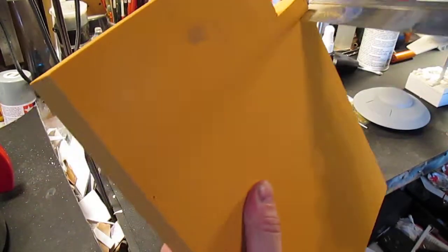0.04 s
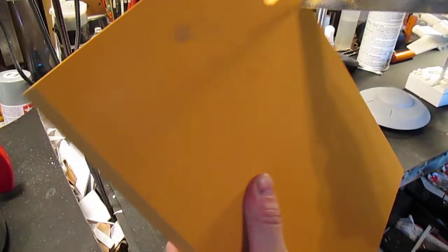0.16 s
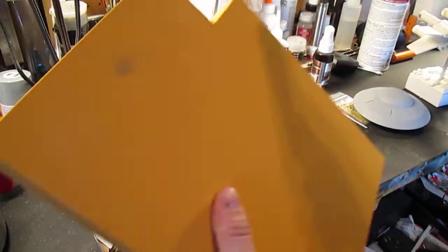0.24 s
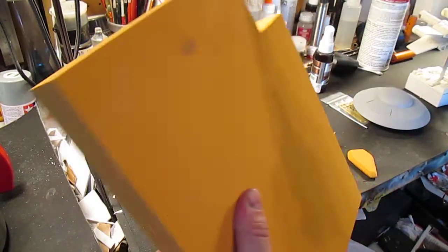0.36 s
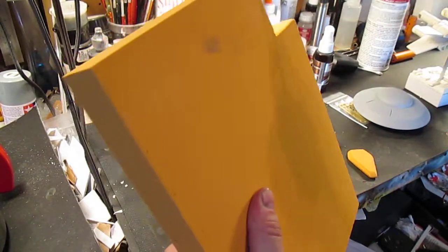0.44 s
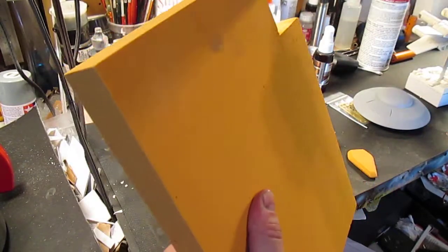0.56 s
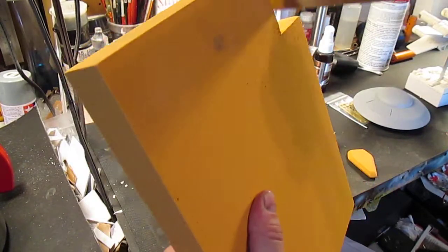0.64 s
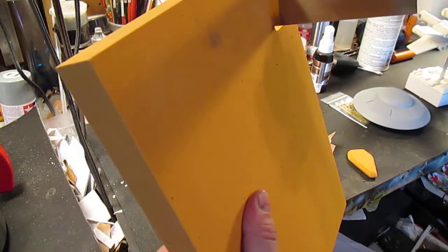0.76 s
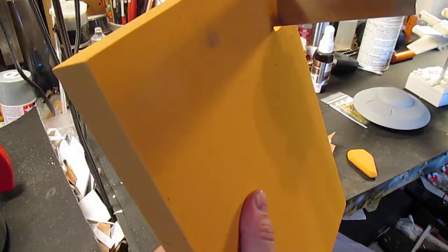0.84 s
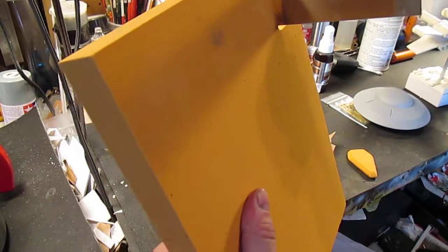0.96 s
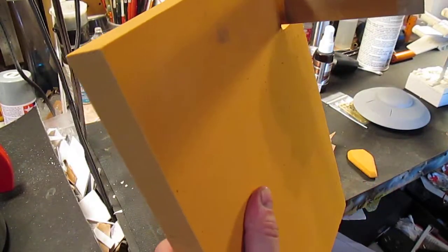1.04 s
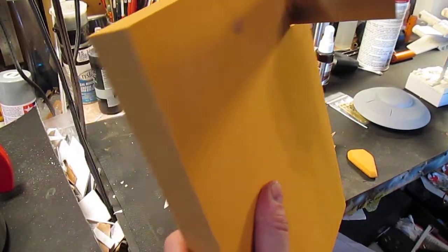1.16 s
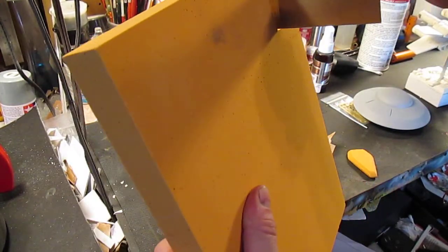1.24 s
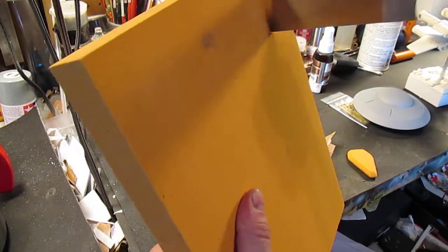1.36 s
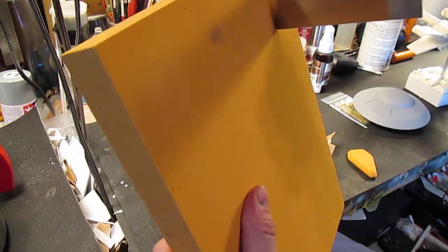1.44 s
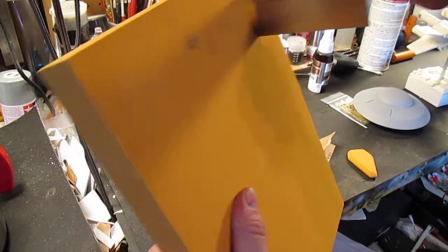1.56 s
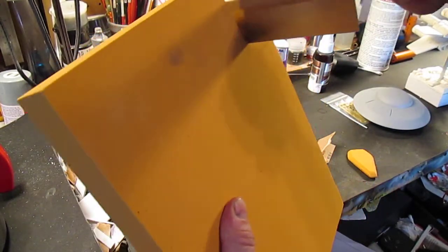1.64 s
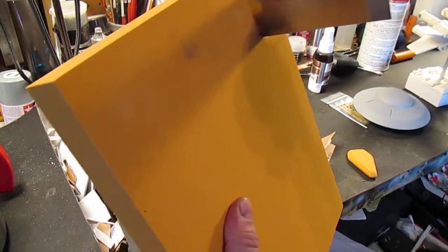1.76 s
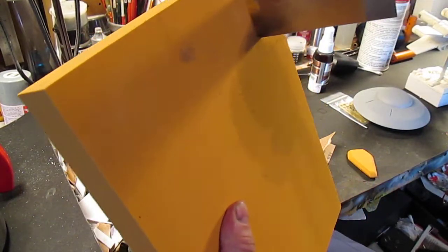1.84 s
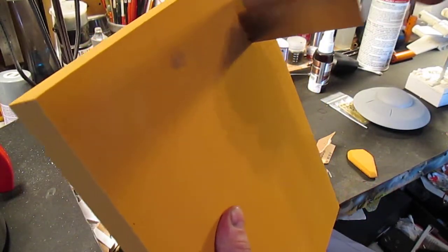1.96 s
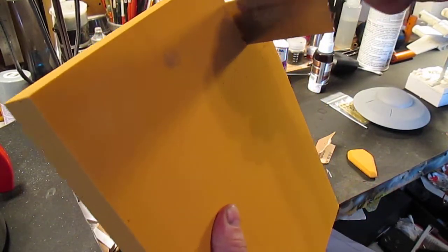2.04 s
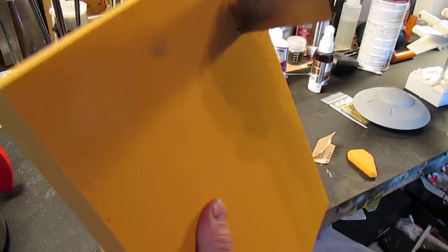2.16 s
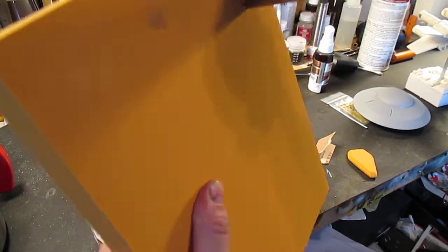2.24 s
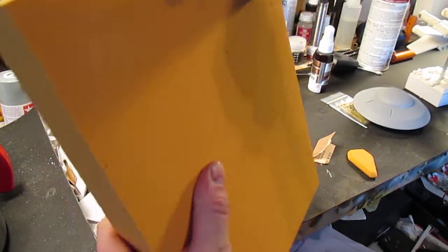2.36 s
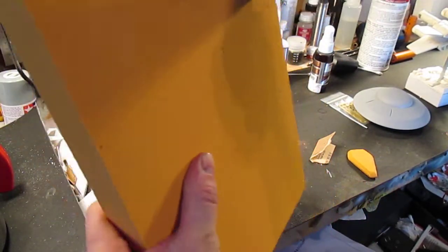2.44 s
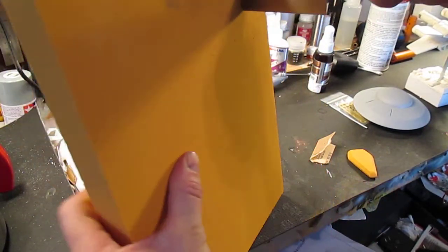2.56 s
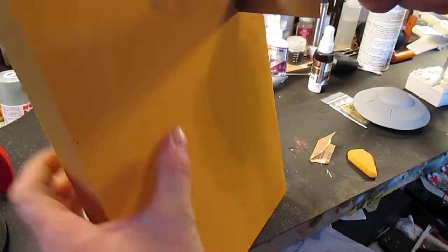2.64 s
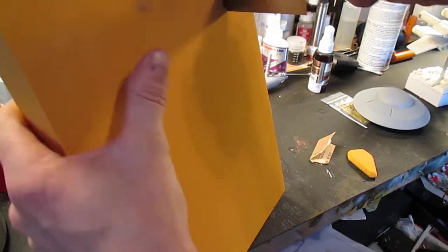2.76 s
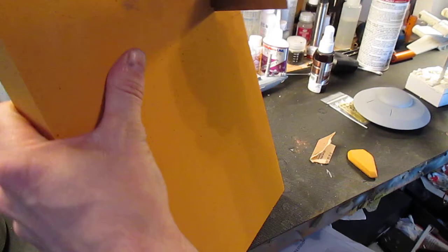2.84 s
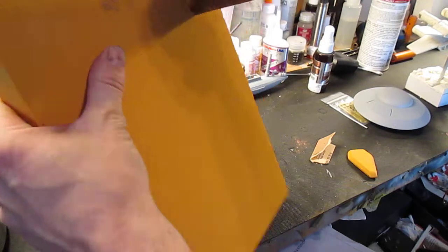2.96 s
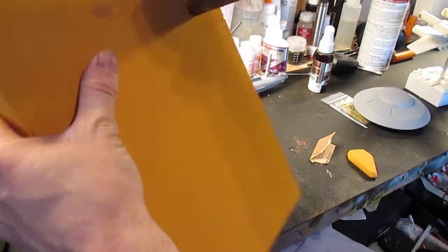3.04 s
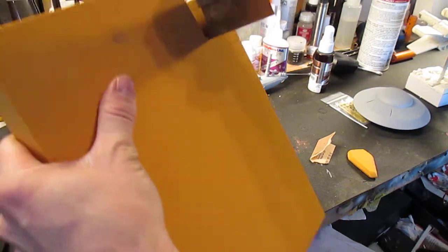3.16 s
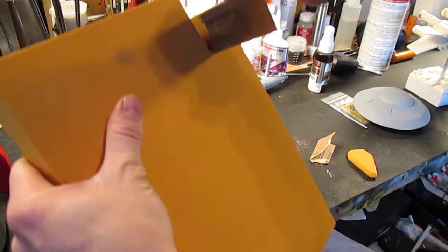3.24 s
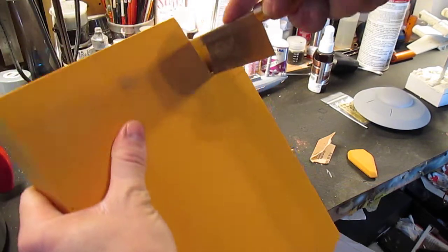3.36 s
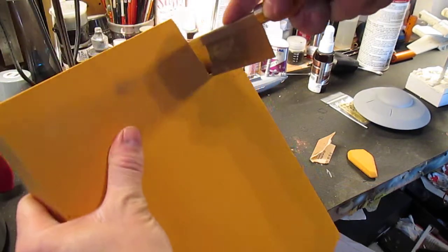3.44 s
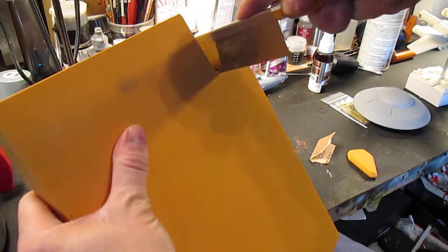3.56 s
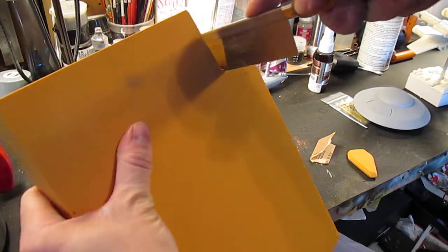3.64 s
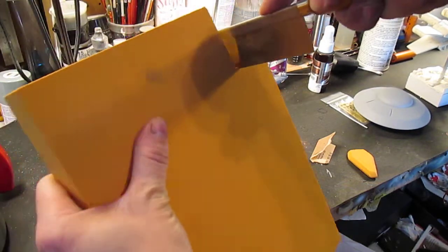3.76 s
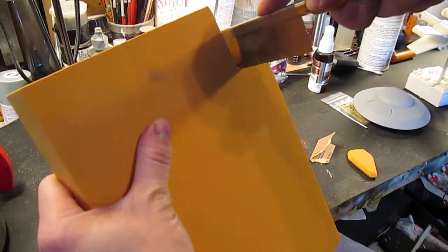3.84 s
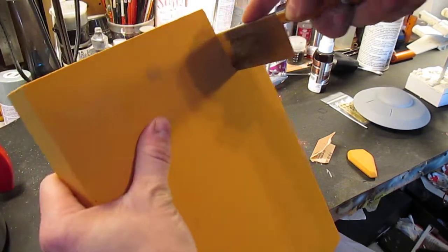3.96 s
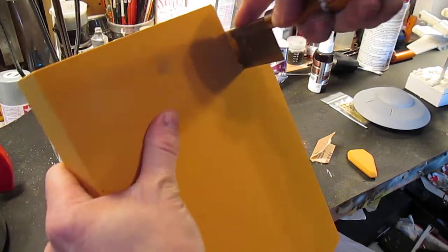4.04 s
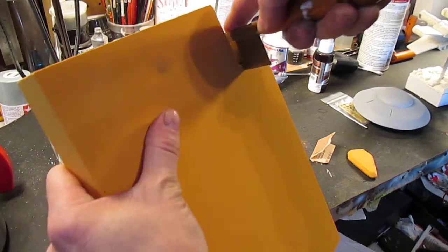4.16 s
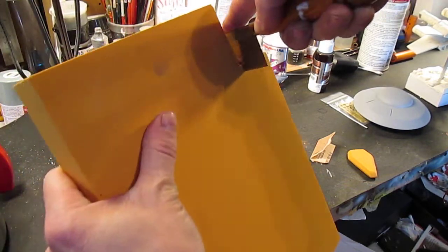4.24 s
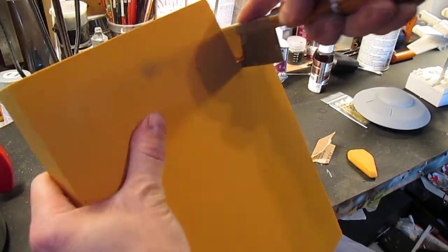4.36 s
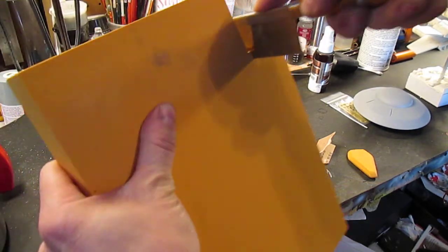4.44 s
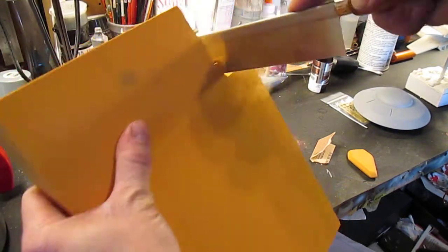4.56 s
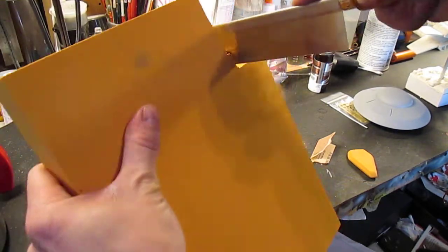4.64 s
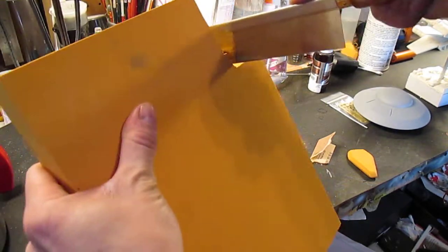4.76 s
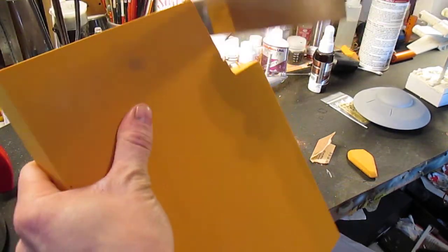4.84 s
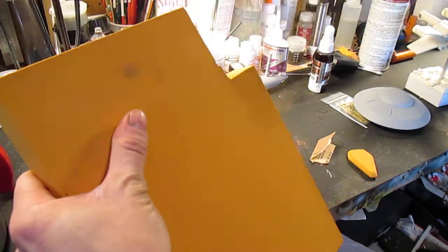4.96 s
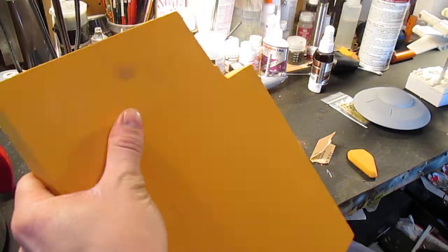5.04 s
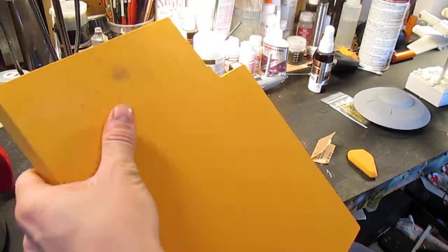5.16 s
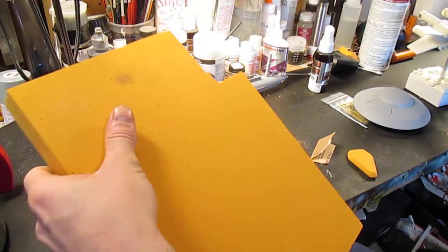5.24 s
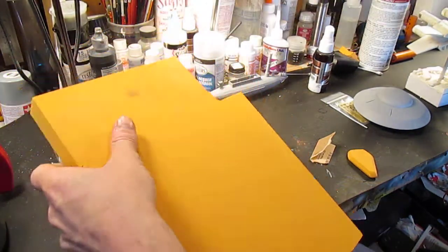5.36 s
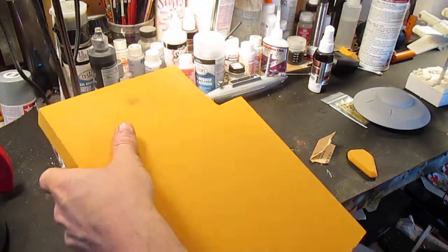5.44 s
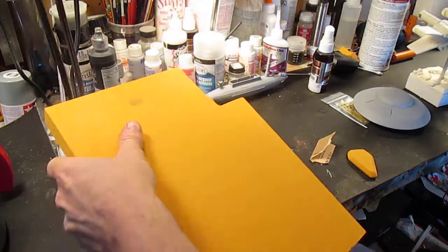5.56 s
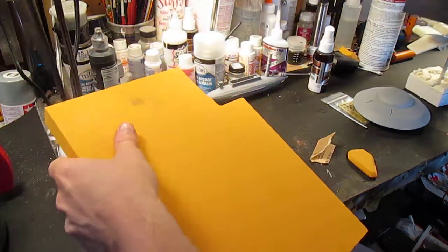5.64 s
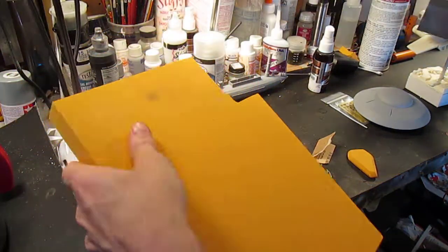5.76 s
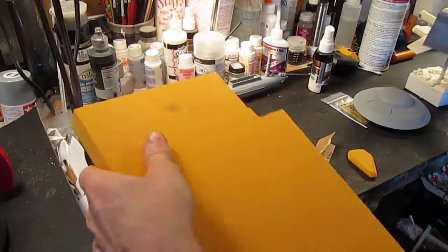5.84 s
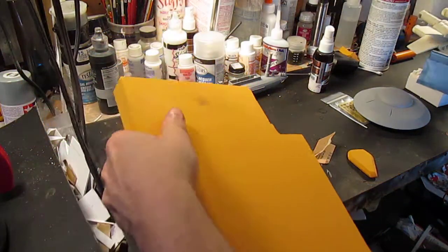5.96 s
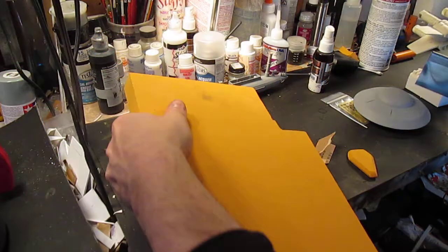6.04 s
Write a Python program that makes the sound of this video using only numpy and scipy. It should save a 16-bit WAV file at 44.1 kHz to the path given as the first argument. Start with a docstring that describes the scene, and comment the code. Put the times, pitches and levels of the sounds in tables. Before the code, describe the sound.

A small hand saw rasps through a block of hard foam in two runs of quick strokes until a corner cracks off.

```python
"""A small hand saw rasps through a hand-held block of hard foam in two runs of quick strokes, until a corner snaps off.
Sawing, and rubbing fingers, are random grains through resonances of blade and block; snaps and bumps are noise bursts.
The thin blade, sprung clear, rings as decaying sines; the loose corner squeaks as a falling tone.
All is close, over a workbench in a small, quiet workshop: a short noise tail and faint coloured noise for the air."""
import sys
import numpy as np
from scipy import signal
from scipy.fft import rfft, irfft, next_fast_len
from scipy.io import wavfile
from scipy.ndimage import map_coordinates

SR = 44100
rng = np.random.default_rng(int(sys.argv[2]) if len(sys.argv) > 2 else 0)


def put_to_file(sound):
    """Save the sound as 16-bit audio at rate SR, in the file named by the first command-line argument."""
    columns = np.atleast_2d(sound).T  # one column per channel
    safe = np.clip(columns, -1, 1)
    whole_steps = np.round(safe * 32767)
    wavfile.write(sys.argv[1], SR, whole_steps.astype(np.int16))


N = 269230

# resonances of the block alone: (centre [Hz], width [Hz], height [dB])
BLOCK_MODES = [(379.5, 19.6, 14.5), (773, 21, 1), (1020, 98, 3.5), (1220, 130, 5.5), (1780, 100, 4),
               (2870, 32, 2.5), (3164, 43, 7.5)]


def amp(db):
    """Decibels to gain."""
    return 10 ** (np.asarray(db) / 20)


def unit(x):
    """Scale to rms 1."""
    return x / np.sqrt(np.mean(x ** 2) + 1e-20)


def ramp(x):
    """A quarter sine from 0 to 1 as x goes from 0 to 1."""
    return np.sin(np.pi / 2 * np.clip(x, 0, 1))


def along(points, hz):
    """Read (Hz, value) points on a log-frequency axis."""
    f, v = np.transpose(points)
    return np.interp(np.log(hz + 1), np.log(f + 1), v)


def coloured(x, spectrum, modes=()):
    """Minimum-phase filter: a smooth spectrum with resonant peaks standing on it."""
    m = next_fast_len(len(x) + SR // 4, True)
    hz = np.fft.rfftfreq(m, 1 / SR)
    peak_power = 1 + sum(amp(db) ** 2 / (1 + (2 * (hz - centre) / width) ** 2)
                         for centre, width, db in modes)
    gain = amp(along(spectrum, hz)) * np.sqrt(peak_power)
    # fold the cepstrum onto positive time to make the filter causal
    cepstrum = irfft(np.log(gain), m)
    cepstrum[1:m // 2] *= 2
    cepstrum[m // 2 + 1:] = 0
    response = np.exp(rfft(cepstrum))
    return irfft(rfft(x, m) * response, m)[:len(x)]


def wobble(rate_hz):
    """A smooth random curve with rate_hz knots a second."""
    knots = rng.standard_normal(int(N * rate_hz / SR) + 4)
    return map_coordinates(knots, [np.arange(N) * rate_hz / SR])


def grains(rate_hz, spread_db):
    """Tiny impulses at random moments, of random sign and uneven size, rms 1."""
    happens = rng.random(N) < rate_hz / SR
    sign = np.sign(rng.standard_normal(N))
    size = amp(spread_db * np.minimum(rng.standard_normal(N), 2))
    return unit(happens * sign * size)


def add(track, start_s, sound):
    """Mix a sound into the track at start_s."""
    part = track[max(round(start_s * SR), 0):][:len(sound)]
    part += sound[:len(part)]


def room_air(level_db, drift_db):
    """Coloured noise of slowly drifting level: the faint, slightly restless room."""
    # (frequency [Hz], relative level [dB])
    spectrum = [(15, -19), (25, 12), (242, 1.5), (373, 1), (489, -4.5), (936, -6.5), (1260, -10),
                (2550, -18.5), (3250, -16), (3920, -30), (4740, -22), (8830, -24.5), (16000, -35)]
    air = unit(coloured(rng.standard_normal(N), spectrum))
    return amp(level_db + drift_db * wobble(6.5)) * air


def workshop(x, wet_db):
    """Bench and cluttered walls answer with a short noise tail, decaying at its own rate in each band."""
    # decay: (frequency [Hz], t60 [s])
    decay = [(150, 0.22), (1000, 0.19), (4000, 0.22), (8000, 0.18), (15000, 0.17)]
    hz, t, z = signal.stft(rng.standard_normal(SR // 2), SR, nperseg=256)
    fading = z * amp(-60 * t / along(decay, hz)[:, None])
    tail = signal.istft(fading, SR, nperseg=256)[1]
    tail = np.pad(tail / np.linalg.norm(tail), (SR // 400, 0))  # starts 2.5 ms late
    return x + amp(wet_db) * signal.fftconvolve(x, tail)[:N]


def squeak():
    """Stick and slip of the loose corner on the blade, falling in pitch as the contact slackens."""
    # (start [s], length [s], start pitch [Hz], end pitch [Hz], level [dB])
    start_s, length_s, start_hz, end_hz, db = (4.722, .042, 930, 790, -42)
    u = np.linspace(0, 1, round(length_s * SR))
    phase = 2 * np.pi * np.cumsum(start_hz + (end_hz - start_hz) * u) / SR
    swell = np.sqrt(np.abs(np.sin(np.pi * u)))
    track = np.zeros(N)
    add(track, start_s, amp(db) * swell * np.sin(phase))
    return track


def blade(scatter_db):
    """Sprung clear of the foam, the steel rings on until a touch damps it; each release favours other modes."""
    # releases: (time [s], level [dB])
    releases = [(0.162, -49), (4.793, -44)]
    # blade modes: (frequency [Hz], first release [dB], second release [dB], undamped t60 [s])
    modes = [(1059, -5, -11, 1), (1290, -20, -2, 1.2), (1690, 1, -3.5, 1.3), (2060, 4, -0.5, 0.34),
             (2900, -1, -25, 0.48), (3320, -22, -6.5, 0.64), (3510, -6.5, -25, 1.5), (3660, -7, -9, 0.59),
             (4230, -15, -5, 0.65), (4662, -25, -3, 0.5), (4700, -31, 15, 0.063), (5173, -5, -18, .3),
             (5270, -12, -17, .9), (6768, -9, -9, 1.24), (7480, -20, -5, 0.51), (8366, -5, -23, 0.3),
             (9200, -29, -10, 0.67)]
    t = np.arange(SR // 2) / SR
    damping = np.clip((.36 - t) / 0.19, 0, 1)
    hz, *strengths, t60_s = np.transpose(modes)[:, :, None]
    steel = np.zeros(N)
    for (start_s, db), mode_db in zip(releases, strengths):
        scattered_db = mode_db + scatter_db * rng.standard_normal(hz.shape)
        ring = amp(scattered_db - 60 * t / t60_s) * np.sin(2 * np.pi * hz * t)
        add(steel, start_s, amp(db) * damping * ring.sum(axis=0))
    return steel


def bumps(t60_s, shudder, level_db):
    """A dull push of the light block on hand or bench: an impulse and a brief noisy shudder, low-pitched."""
    # (time [s], relative level [dB])
    hits = [(0.158, -30.5), (0.899, -35), (2.514, -8.5), (2.776, -32), (2.792, -25.5), (2.837, -24),
            (2.895, -26.5), (3.476, -32), (3.744, -28), (4.461, -9), (4.483, -17.5), (4.493, -27),
            (4.635, -32)]
    # (frequency [Hz], relative level [dB])
    thud = [(25, -28), (70, -3), (170, 6.5), (330, 0.5), (500, -19), (1000, -16), (3000, -47)]
    t = np.arange(SR // 5) / SR
    pushes = np.zeros(N)
    for start_s, db in hits:
        push = shudder * rng.standard_normal(len(t)) * amp(-60 * t / t60_s)
        push[0] = 1
        add(pushes, start_s, amp(db + level_db) * push)
    return coloured(pushes, thud)


def snaps(t60_s, spike, crack_db, knock_db):
    """Foam cracks or teeth catch: one sharp break, a short crumble behind it and a knock in the block."""
    # (time [s], relative level [dB], knock over that level [dB])
    breaks = [(0.157, -13.5, -22), (0.443, -22, -6), (0.741, -13.5, -8), (1.719, -15, -20),
              (1.747, -15, -30), (2.453, -22, -19), (3.694, -12, -16), (3.722, -7, -9), (4.353, -2, -19),
              (4.364, -4.5, -12), (4.448, 5, -23), (4.462, -1.5, -5.5), (4.569, -12.5, -29),
              (4.713, -30, 0), (4.721, -22, -7), (4.766, -15, -32), (4.794, -11.5, -39)]
    # spectra: (frequency [Hz], relative level [dB])
    crack, knock = [(200, -11), (700, -5), (1200, 1.5), (2500, -4), (5000, -3.5), (8500, -7), (12000, -10),
                    (16000, -30)], [(40, -17), (120, -8), (340, 1.5), (560, -10), (900, -7.5), (1500, -13.5),
                                   (4000, -52)]
    t = np.arange(SR // 10) / SR
    cracks, knocks = np.zeros(N), np.zeros(N)
    for start_s, db, low_db in breaks:
        burst = rng.standard_normal((2, len(t))) * amp(-60 * t / t60_s)
        burst[:, 0] = spike
        add(cracks, start_s, amp(db + crack_db) * burst[0])
        add(knocks, start_s, amp(db + low_db + knock_db) * burst[1])
    return coloured(cracks, crack, BLOCK_MODES) + coloured(knocks, knock)


def slide_effort():
    """Each slide breaks loose, fades evenly in dB and comes to rest; the holding hand is never quite still."""
    # skin or flat steel over foam: (start [s], length [s], mid-slide level [dB], fade over the slide [dB])
    slides = [(0.0, 0.03, -44.5, 15), (0.494, 0.12, -42, 2), (0.684, 0.09, -44, 8.5),
              (2.232, 0.058, -53, 9), (2.348, .03, -50.5, -2), (2.449, 0.032, -40, -4),
              (2.489, 0.11, -31, 10), (2.718, 0.048, -40, 0.5), (2.829, .085, -36, -2.5),
              (3.309, 0.058, -36.5, 3), (4.761, 0.085, -42.5, 6), (5.031, 0.024, -45, -2),
              (5.168, .025, -46.5, 2), (5.298, 0.025, -33, 4.5), (5.382, 0.12, -34.5, 0),
              (5.53, 0.18, -42, 0), (5.732, 0.063, -41, 0), (5.885, 0.031, -36.5, 3.5),
              (5.965, 0.033, -36.5, 11)]
    # faint rustle of the holding hand: (time [s], level [dB])
    grip = [(0, -57), (.4, -79), (1, -61.5), (2.2, -58), (2.42, -56), (2.7, -49), (3.05, -52.5),
            (3.4, -57.5), (4.7, -60.5), (4.9, -56.5), (5.3, -50), (5.85, -60.5), (6.1, -57)]
    attack_s, release_s = 0.0077, 0.026
    fidget_db, fidget_hz = 2.5, 22
    effort = np.zeros(N)
    for start_s, length_s, db, fade_db in slides:
        t = np.arange(round((length_s + release_s) * SR)) / SR
        edges = ramp(t / attack_s) * np.clip(1 - (t - length_s) / release_s, 0, 1)
        add(effort, start_s, amp(db - fade_db * (t / length_s - .5)) * edges)
    grip_db = np.interp(np.arange(N) / SR, *np.transpose(grip)) + fidget_db * wobble(fidget_hz)
    return np.maximum(effort, amp(grip_db))


def rubbing(slip_rate_hz, spread_db, judder_db, level_db):
    """Sliding over the gritty surface makes fine slips that sound through the block."""
    # (frequency [Hz], relative level [dB])
    rub = [(40, -24), (100, -3.5), (260, -2), (450, 1), (800, -0.5), (1500, -4), (3000, -7), (5500, -8),
           (9500, -14.5), (12000, -22), (16000, -39)]
    slips = grains(slip_rate_hz, spread_db) * amp(judder_db * wobble(150))
    return amp(level_db) * slide_effort() * unit(coloured(slips, rub, BLOCK_MODES))


def block_ring(x, t60_s, ring_db, lowest_hz):
    """Above its few broad resonances the stiff block has a crowd of short-lived modes: decaying noise."""
    t = np.arange(SR // 8) / SR
    highpass = signal.butter(2, lowest_hz, "high", fs=SR, output="sos")
    ring = signal.sosfilt(highpass, rng.standard_normal(len(t))) * amp(-60 * t / t60_s)
    ringing = signal.fftconvolve(x, ring / np.linalg.norm(ring))[:N]
    return (x + amp(ring_db) * ringing) / np.hypot(1, amp(ring_db))


def stroke_effort(strokes):
    """The arm speeds up, eases its pressure and brakes; returns the gains of rasp and crunch."""
    brake_s, ease_db_per_s = 0.039, 40
    # crunch grows more slowly than rasp, so hard strokes are brighter
    speed_power, crunch_power = 1.91, 0.86
    t, rasp, crunch = np.arange(N) / SR, np.zeros(N), np.zeros(N)
    for start_s, length_s, rise_s, db, extra_db in strokes:
        speed = ramp((t - start_s) / rise_s) * ramp((start_s + length_s - t) / brake_s)
        pressure_db = db - ease_db_per_s * np.clip(t - start_s - rise_s, 0, length_s)
        effort = amp(pressure_db) * speed ** speed_power
        rasp = np.maximum(rasp, effort)
        crunch = np.maximum(crunch, amp(extra_db) * effort ** crunch_power)
    return rasp, crunch


def sawing(strokes, hiss, crunch, modes, cell_rate_hz, spread_db, judder_db, rasp_db, crunch_db):
    """Teeth burst foam cells by the thousand; coarser crumbs tear out and shake the block."""
    bite = amp(judder_db * wobble(260))  # the teeth grab and let go unevenly
    rasp = unit(coloured(bite * grains(cell_rate_hz, spread_db), hiss, modes))
    crumbs = unit(coloured(bite * grains(cell_rate_hz / 3, spread_db), crunch, modes))
    rasp_gain, crunch_gain = stroke_effort(strokes)
    return amp(rasp_db) * rasp_gain * rasp + amp(crunch_db) * crunch_gain * crumbs


def scene():
    """Saw, hands and block in the workshop."""
    # strokes in a shallow cut, strokes deep in the block, and smooth glides of the blade into or out of
    # the kerf, at last of the block over the bench:
    # (start [s], length [s], rise to full speed [s], relative level [dB], extra crunch [dB])
    shallow_strokes, deep_strokes, glide_strokes = [(1.051, 0.1, 0.056, -16.5, -2),
                                                    (1.253, 0.13, 0.045, -23, -1.5),
                                                    (1.44, 0.058, 0.013, -43.5, 1),
                                                    (1.464, 0.082, 0.032, -18.5, 0),
                                                    (1.625, .17, .12, -41, -0.5),
                                                    (1.738, 0.046, 0.015, -23, -2),
                                                    (1.765, 0.092, 0.0086, -43.5, 2),
                                                    (1.884, 0.19, .092, -24, 3.5)], [(2.045, 0.12, 0.065, -29, 2),
                                                                       (3.495, .093, 0.042, -44.5, -1.5),
                                                                       (3.62, 0.067, 0.038, -46.5, -1),
                                                                       (3.733, 0.044, 0.013, -27.5, -1),
                                                                       (3.818, 0.082, 0.05, -26.5, -1),
                                                                       (3.949, 0.084, 0.029, -21.5, -1),
                                                                       (4.11, 0.11, 0.024, -24.5, 1.5),
                                                                       (4.277, 0.086, 0.033, -28, -1.5),
                                                                       (4.387, 0.077, 0.036, -33.5, .5),
                                                                       (4.444, 0.06, 0.011, -27, -1.5)], [(0.07, 0.11, 0.11, -37.5, 2.5),
                                                                                         (2.93, 0.057, 0.022, -30, -1),
                                                                                         (3.139, .098, 0.012, -27.5, 1.5),
                                                                                         (3.165, 0.18, 0.13, -32.5, 3.5),
                                                                                         (4.48, 0.087, 0.012, -32, -7),
                                                                                         (4.563, 0.085, 0.013, -40, -9.5),
                                                                                         (6.056, .052, 0.017, -26, -4)]
    # resonances of block and blade: (centre [Hz], width [Hz], height [dB])
    shallow_modes, deep_modes = [(212, 47, 8.5), (396, 39, 5), (850, 58, 12.5), (1223, 64, 6.5),
                                 (1677, 99, 9.5), (1833, 41, 7.5), (2800, 143, 9.5), (5080, 46, 5),
                                 (5500, 44, 6), (5610, 85, 6.5), (7250, 220, 8.5), (8700, 190, 3)], [(208, 32, 6), (344, 82, 10.5), (456, 22, 5),
                                                        (757, 56, 6), (950, 71, 7.5), (1335, 23, 7),
                                                        (1816, 110, 2.5), (2096, 73, 6), (2340, 18, 9),
                                                        (3270, 39, 7.5), (4400, 33, 9), (5420, 50, 6),
                                                        (7280, 140, 6.5), (8900, 180, 5)]
    # spectra: (frequency [Hz], relative level [dB])
    rasp, glide_rasp = [(900, -31), (1800, -4), (2700, -1), (4000, 1), (5500, -2), (7500, -5), (9500, -3.5),
                        (12000, -14), (16000, -30)], [(900, -26), (1800, -4.5), (3000, -2), (5500, -1), (9000, -4.5),
                                      (13000, -12), (16000, -28)]
    shallow_crunch, deep_crunch = [(40, -18), (110, -2.5), (200, -1), (420, -0.5), (590, -6), (850, -0.5),
                                   (1500, -3.5), (2300, -8.5), (3500, -19), (7000, -43)], [(40, -1), (100, -1), (200, -0.5), (450, 0.5),
                                                           (610, -11), (820, 2), (1500, -2), (2400, -6.5),
                                                           (3500, -18.5), (7000, -31)]
    glide_crunch = [(60, -20), (300, -0.5), (500, -5.5), (680, 3), (1000, -6), (1600, -2.5), (2600, -8),
                    (7000, -44)]

    shallow = sawing(shallow_strokes, rasp, shallow_crunch, shallow_modes, cell_rate_hz=7400,
                     spread_db=4.5, judder_db=0.8, rasp_db=0, crunch_db=-3)
    deep = sawing(deep_strokes, rasp, deep_crunch, deep_modes, cell_rate_hz=6000,
                  spread_db=2.5, judder_db=1.7, rasp_db=-0.1, crunch_db=0.5)
    glides = sawing(glide_strokes, glide_rasp, glide_crunch, BLOCK_MODES, cell_rate_hz=12000,
                    spread_db=3.5, judder_db=1.6, rasp_db=0, crunch_db=-4)
    hands = rubbing(slip_rate_hz=6000, spread_db=3, judder_db=1.5, level_db=0.5)
    friction = block_ring(shallow + deep + glides + hands, t60_s=0.052, ring_db=-5.5, lowest_hz=1700)
    cracking = snaps(t60_s=0.05, spike=4, crack_db=-8.5, knock_db=12.5)
    bumping = bumps(t60_s=0.081, shudder=0.036, level_db=34)
    close = friction + cracking + bumping + blade(scatter_db=1.5) + squeak()
    return (workshop(close, wet_db=-11.5) + room_air(level_db=-51.8, drift_db=2.5))[None]


def record(dry):
    """Clip at full scale, cut two narrow dips in the treble and drop all above the band limit."""
    top_hz = 16200
    m = next_fast_len(N + SR // 4)
    hz = np.fft.rfftfreq(m, 1 / SR)
    dips = np.prod([(hz - centre) / (hz - centre - 45j) for centre in (3930, 7860)], axis=0)
    spectrum = rfft(np.clip(dry, -1, 1), m)
    return irfft(spectrum * dips * (hz < top_hz), m)[..., :N]


dry = scene()
out = record(dry)
put_to_file(out)
```